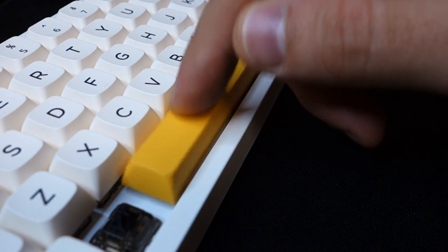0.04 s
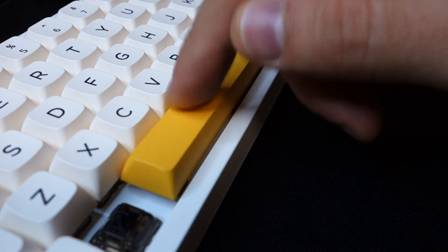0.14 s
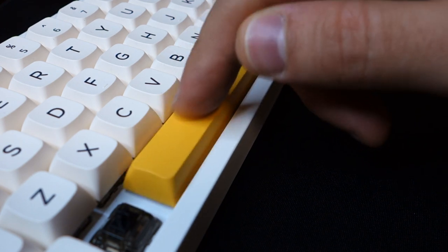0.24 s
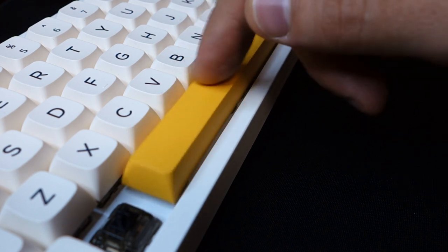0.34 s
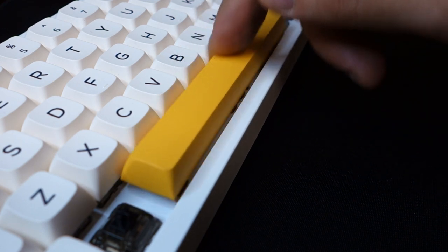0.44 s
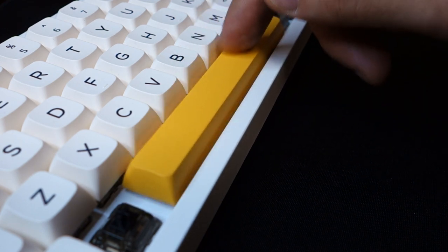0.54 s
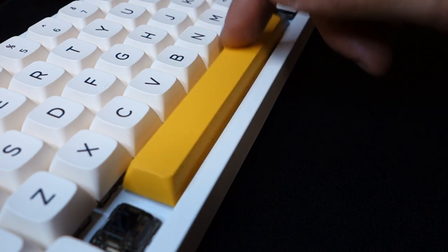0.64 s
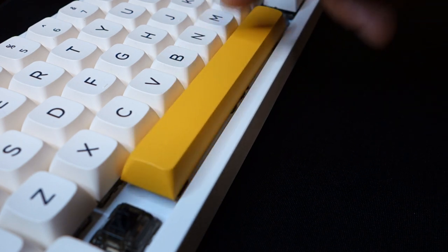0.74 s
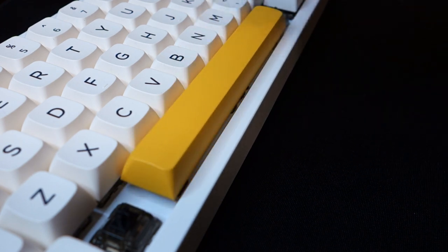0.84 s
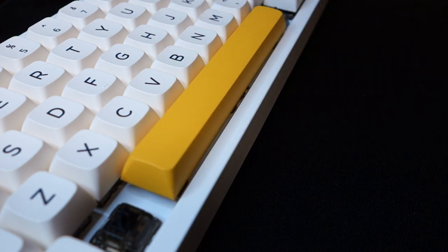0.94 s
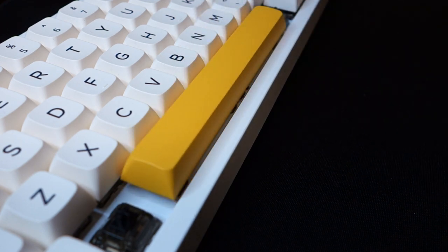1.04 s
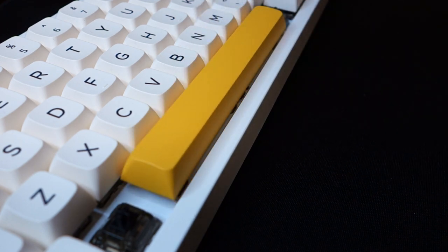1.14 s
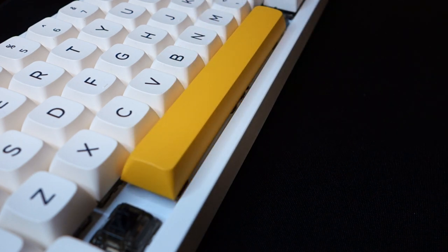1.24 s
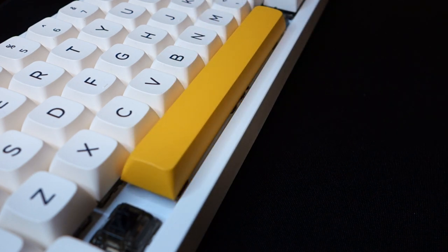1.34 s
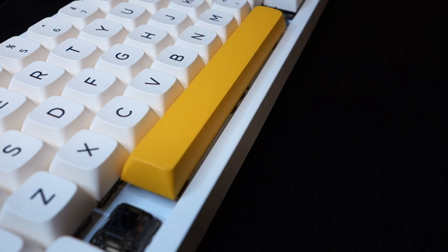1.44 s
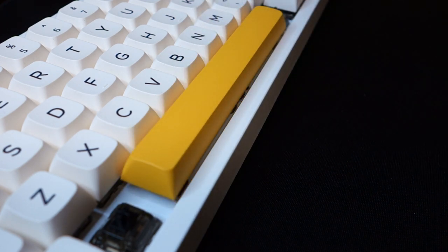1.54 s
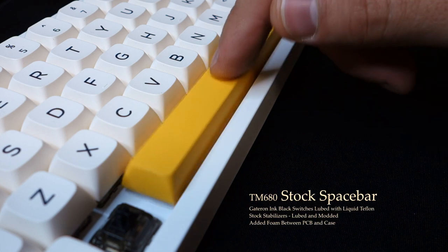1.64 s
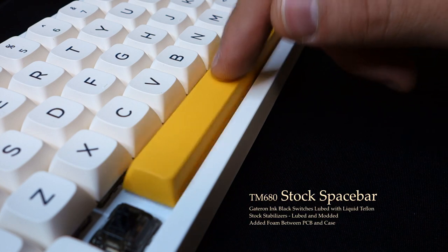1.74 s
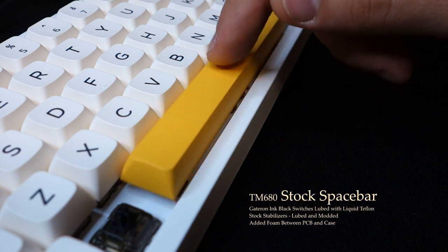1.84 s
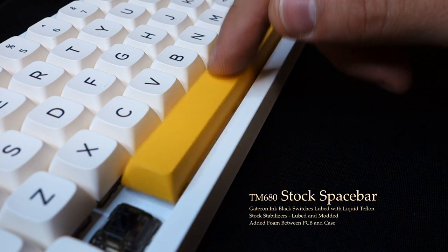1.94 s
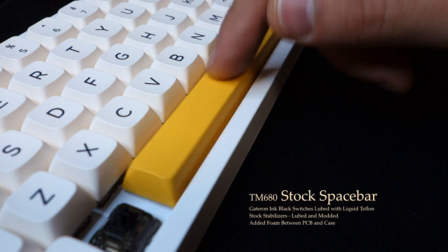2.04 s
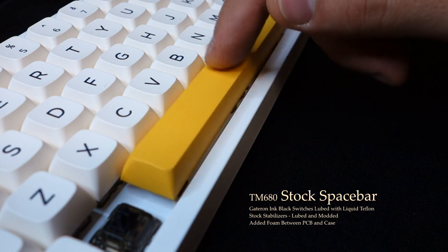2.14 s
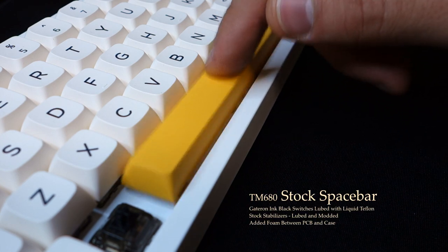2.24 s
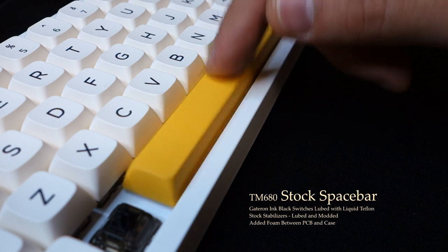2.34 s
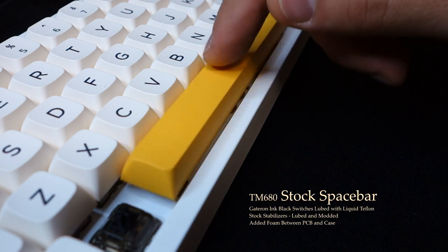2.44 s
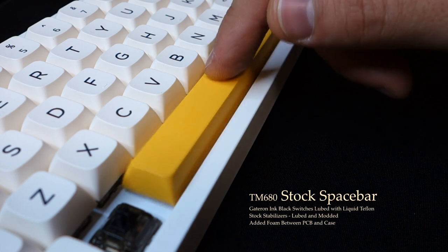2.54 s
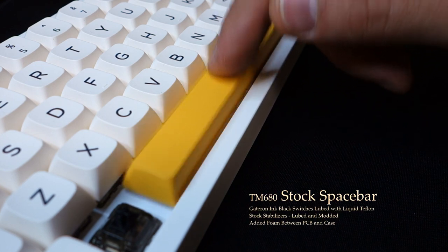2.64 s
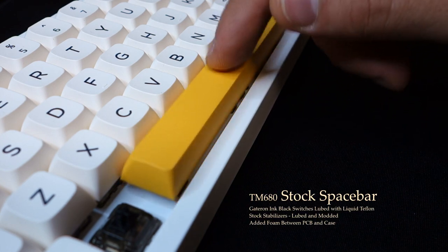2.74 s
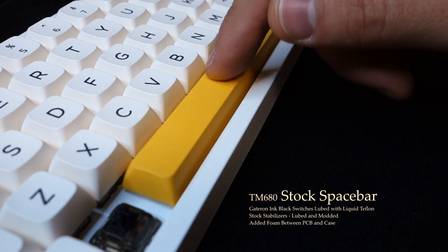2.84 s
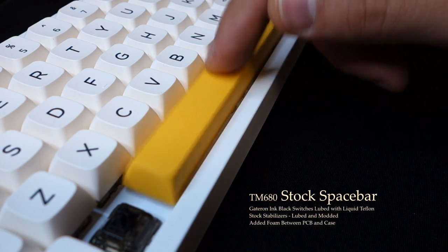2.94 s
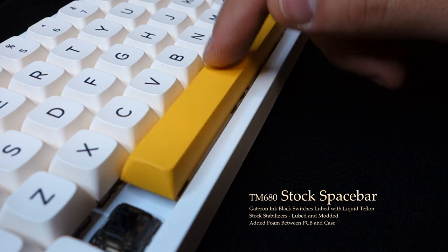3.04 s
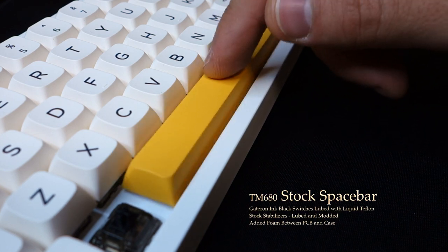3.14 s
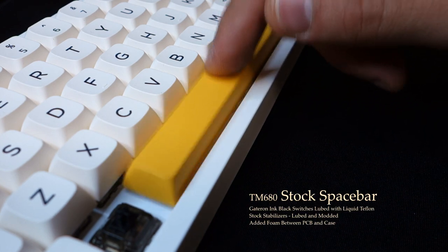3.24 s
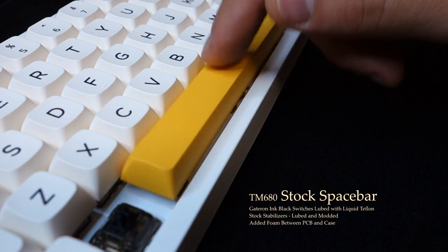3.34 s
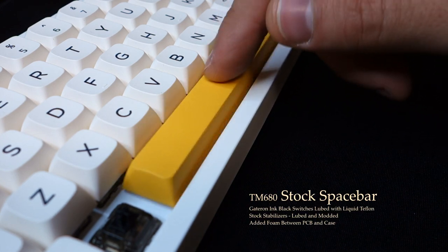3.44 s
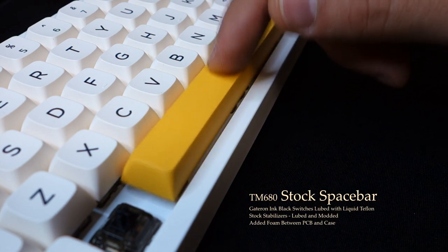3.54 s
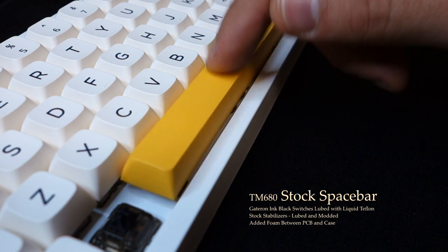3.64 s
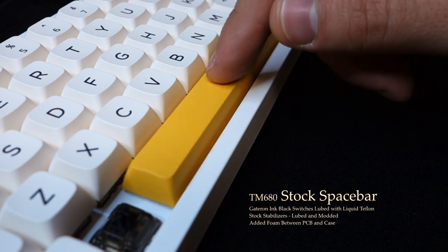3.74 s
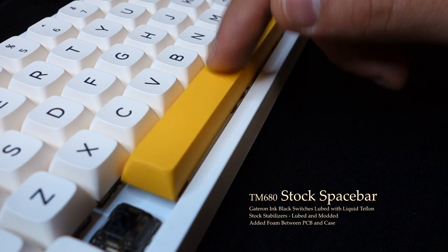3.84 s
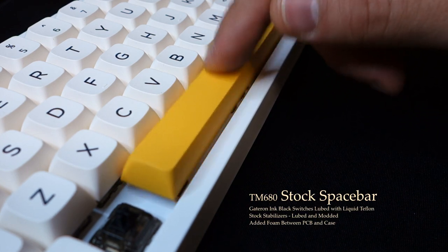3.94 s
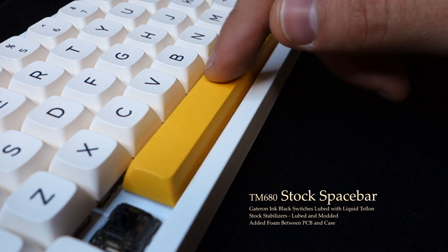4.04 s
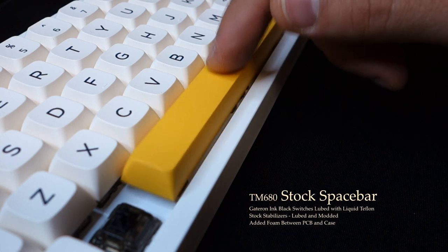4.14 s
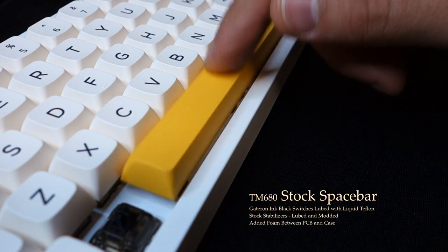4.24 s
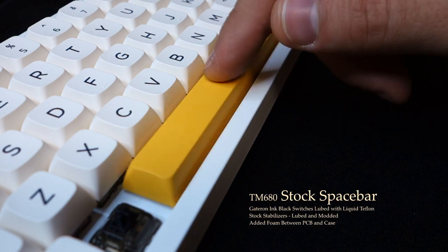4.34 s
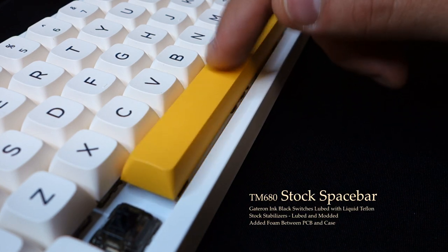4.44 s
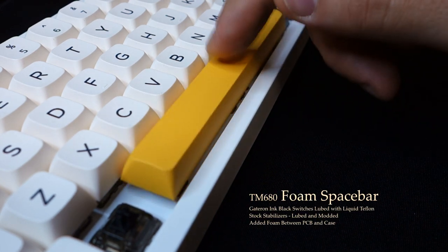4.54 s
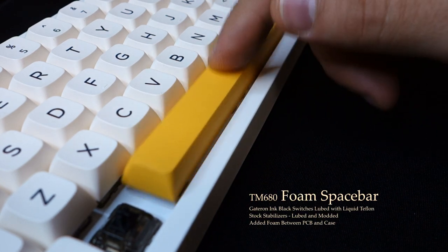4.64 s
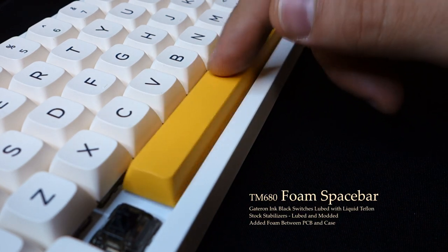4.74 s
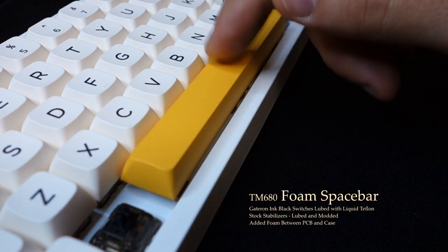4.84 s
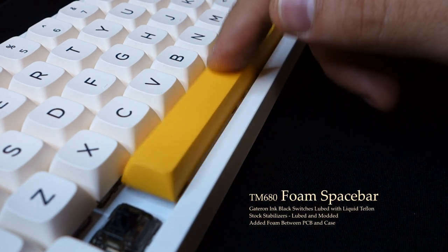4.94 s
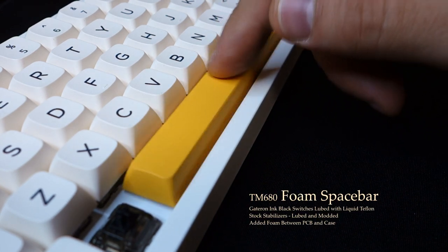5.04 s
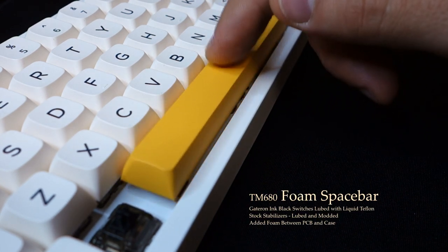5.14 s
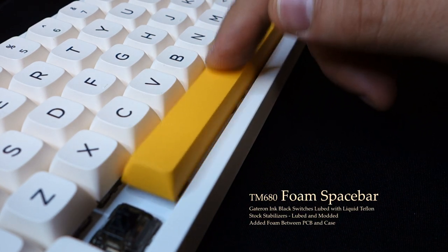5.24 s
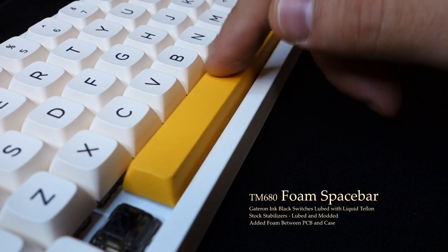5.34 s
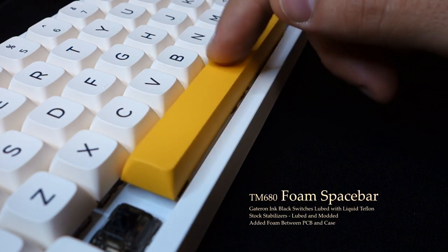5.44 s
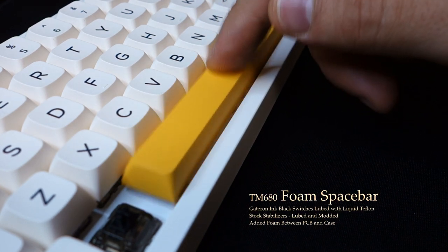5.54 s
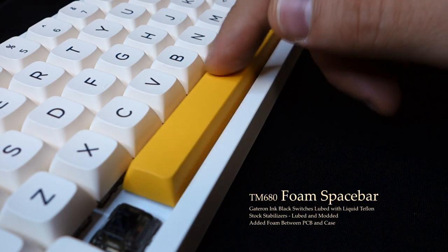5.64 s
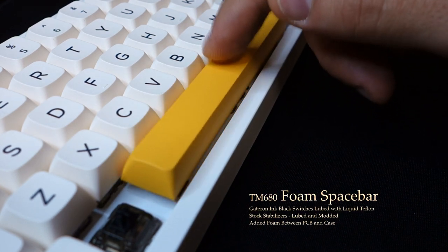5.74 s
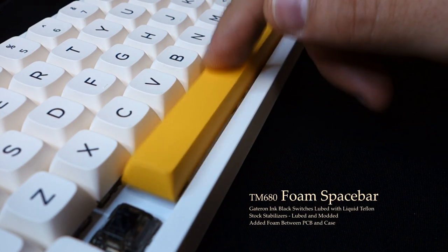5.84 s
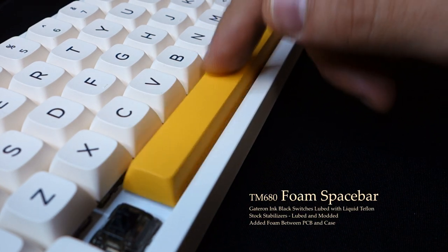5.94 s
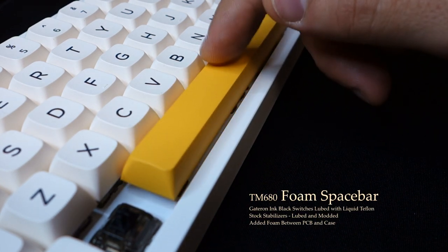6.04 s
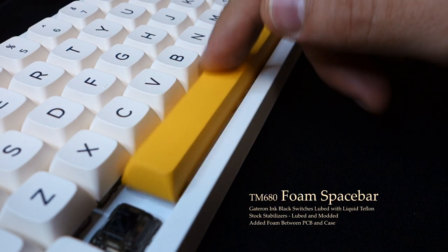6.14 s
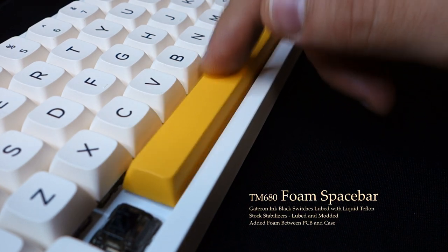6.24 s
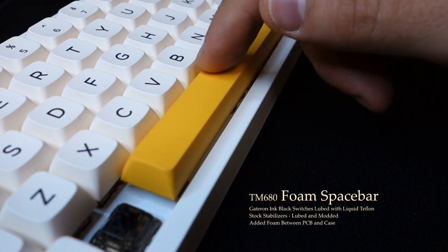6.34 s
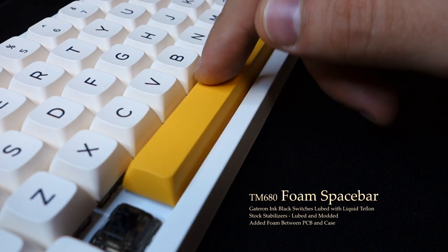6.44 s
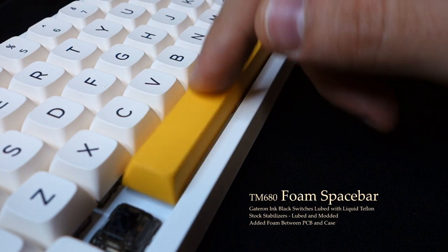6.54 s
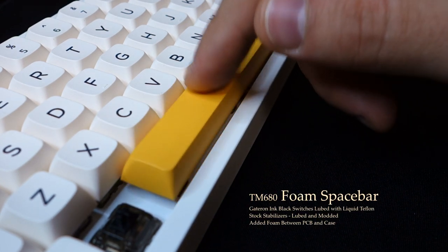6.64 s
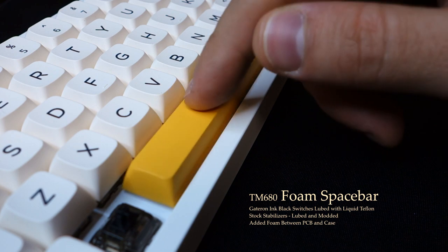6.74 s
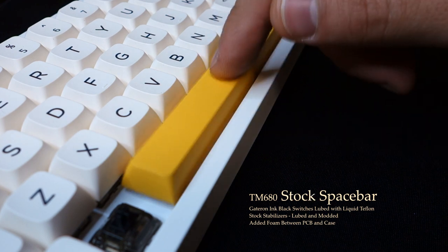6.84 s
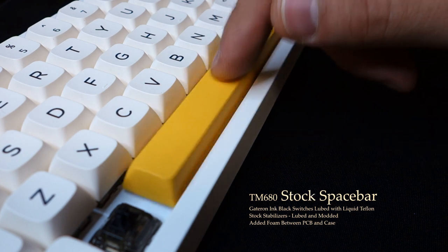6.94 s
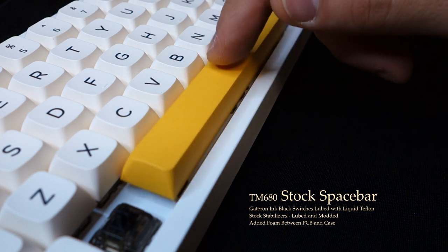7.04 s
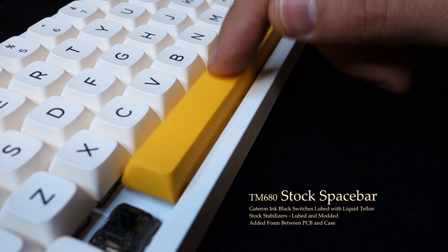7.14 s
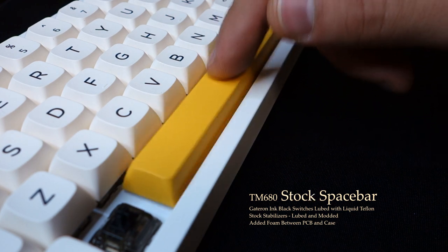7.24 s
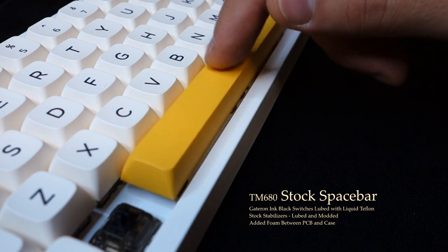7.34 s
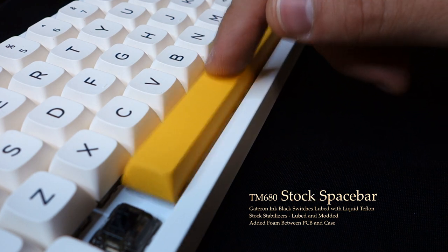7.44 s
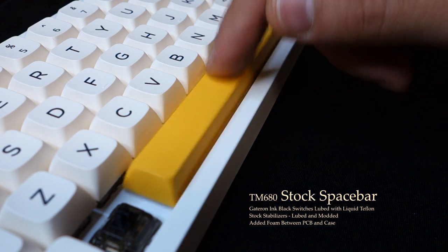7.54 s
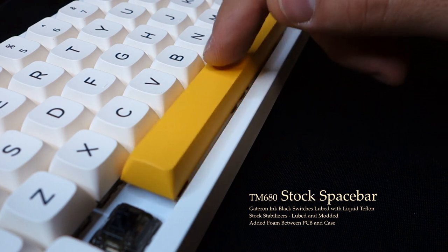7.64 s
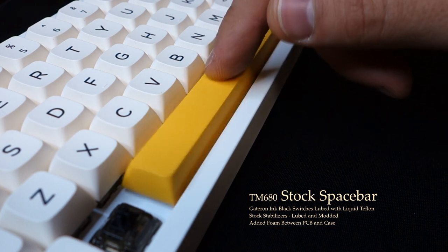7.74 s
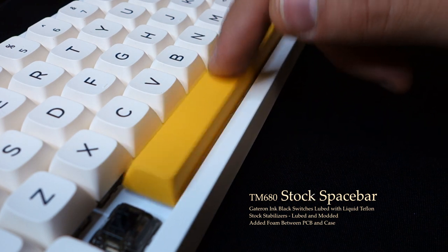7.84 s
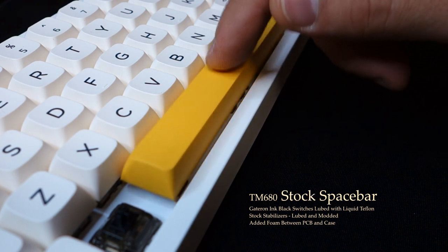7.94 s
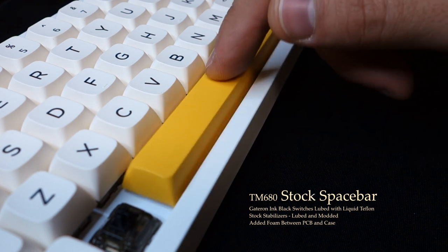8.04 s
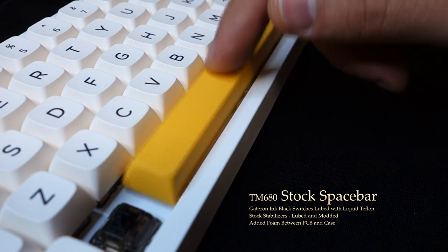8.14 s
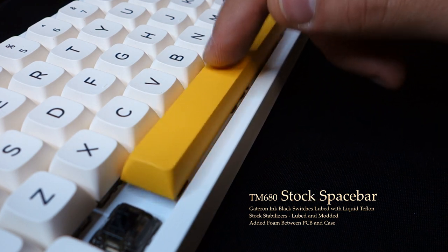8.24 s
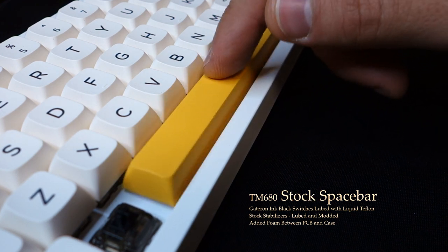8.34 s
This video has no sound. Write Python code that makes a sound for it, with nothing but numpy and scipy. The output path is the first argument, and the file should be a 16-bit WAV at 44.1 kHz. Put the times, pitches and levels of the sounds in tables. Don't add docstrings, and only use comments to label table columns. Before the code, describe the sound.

A finger taps the long bar of a mechanical keyboard on a desk, very close to the microphone. A few muted double knocks fade softer, with a little skin sliding, then a quiet pause. Quick regular pressing follows, loud and hollow at first, duller and tighter in the middle, hollow again at the end. Each press clacks down and clicks back up, over faint air hiss in a small furnished room.

```python
import sys
import numpy as np
from scipy import signal
from scipy.fft import rfft, irfft, next_fast_len
from scipy.io import wavfile
from scipy.ndimage import uniform_filter1d

SR = 44100
rng = np.random.default_rng(int(sys.argv[2]) if len(sys.argv) > 2 else 0)


def generate_wav(sig):
    pcm = np.round(np.clip(np.atleast_2d(sig).T, -1, 1) * 32767).astype(np.int16)
    wavfile.write(sys.argv[1], SR, pcm)


def gain_from_db(level_db):
    decades = np.asarray(level_db, float) / 20
    return 10 ** decades


N = 369999
TIME = np.arange(N) / SR


def decay(t, t60):
    return np.exp(-np.log(1000) * t / t60)


def colour(x, points):
    hz, db = np.transpose(points)
    samples = x.shape[-1]
    size = next_fast_len(samples)
    bins_hz = np.maximum(np.arange(size // 2 + 1) * SR / size, 1)
    gain = gain_from_db(np.interp(np.log(bins_hz), np.log(hz), db))
    return irfft(rfft(x, size) * gain, size)[..., :samples]


def unit(x):
    return x / np.sqrt(np.mean(x ** 2, axis=-1, keepdims=True))


def band(x, hz, width_hz):
    return signal.lfilter(*signal.iirpeak(hz, hz / width_hz, fs=SR), x)


def add(track, start_s, sounds):
    for start, sound in zip((np.asarray(start_s) * SR).astype(int), sounds):
        part = sound[max(-start, 0):N - start]
        start = max(start, 0)
        track[start:start + len(part)] += part


def rings(hz, t60, push_s, length_s):
    t = np.arange(int(length_s * SR)) / SR
    push = np.sin(np.pi * np.clip(t[:400] / push_s, 0, 1)) ** 2
    sines = np.sin(2 * np.pi * hz[:, None] * t) * decay(t, t60[:, None])
    return signal.lfilter(push / push.sum(), 1, sines)


# pitch_hz, density_db (per Hz)
AIR = [(10, -46), (22, -3), (50, 1), (115, -3), (170, -8.5), (350, -15), (700, -22), (1400, -25.5),
       (2800, -27.5), (5600, -31), (10000, -33.5), (15000, -33.5), (16200, -49)]


def still_air():
    return gain_from_db(-57.5) * unit(colour(rng.standard_normal(N), AIR))


# pitch_hz, t60_s, hollow_press_db, foam_press_db, release_db
ROOM = [(212.3, 0.13, -46.5, -42, -40), (297, 0.23, -50, -50, -48.5), (438, 0.093, -36, -44.5, -40.5),
        (680, 0.35, -49, -51, -53.5), (970, 0.056, -29.5, -37.5, -50.5), (1353, 0.11, -41.5, -41, -42.5),
        (1690, .19, -39.5, -44, -57.5), (2120, 0.19, -41.5, -53, -55.5), (2730, 0.21, -43.5, -51, -56.5),
        (3920, 0.036, -78.5, -71, -52.5), (5160, 0.27, -61, -61.5, -69), (7100, 0.11, -63, -66, -71),
        (10300, 0.05, -58, -84, -85)]


def room_bands():
    t = np.arange(int(.3 * SR)) / SR
    start_s, rise_s = 0.006, 0.00043
    edge = 1.17
    noise = []
    for hz, *_ in ROOM:
        sos = signal.butter(2, (hz / edge, hz * edge), "band", fs=SR, output="sos")
        noise.append(signal.sosfilt(sos, rng.standard_normal(len(t))))
    fall = decay(t, np.array(ROOM)[:, 1:2])
    return unit(np.array(noise)) * fall * np.clip((t - start_s) / rise_s, 0, 1)


# start_s, length_s, level_db, sag_db (over the length)
SLIDES = [
    (0.37, .032, -59, -9),
    (0.46, .1, -57.5, -2),
    (.65, .04, -62, -3),
]
# pitch_hz, width_hz, level_db
SLIDE_MODES = [(2800, 600, 6.5), (5070, 400, 4), (6760, 370, 3), (7900, 320, 2), (9050, 400, -5),
               (13500, 4700, -7)]


def slide():
    flicker = np.repeat(rng.standard_normal(N // 200 + 1), 200)[:N]
    noise = rng.standard_normal(N) * gain_from_db(3.2 * uniform_filter1d(flicker, size=200))
    hiss = unit(sum(gain_from_db(db) * band(noise, hz, width_hz) for hz, width_hz, db in SLIDE_MODES))
    start_s, length_s, level_db, sag_db = np.transpose(SLIDES)[:, :, None]
    outside_s = np.maximum(np.maximum(start_s - TIME, TIME - start_s - length_s), 0)
    held_db = level_db + sag_db * np.clip((TIME - start_s) / length_s, 0, 1)
    edge_db_per_s = 1400
    return hiss * gain_from_db(held_db - edge_db_per_s * outside_s).sum(axis=0)


LANDINGS_DB = [
    (-65, -65, -65, -48, -49, -65, -44),
    (-65, -65, -65, -49, -51, -65, -45, -65, -46, -59, -48, -51, -53, -43, -47, -49, -49, -49, -52, -53),
    (-65, -41, -50, -40, -53, -50, -65, -51, -56, -47, -43, -62, -54, -65, -65, -44),
]
# pitch_hz, level_db
TAP = [(500, -20), (1200, -4), (2200, 7), (3300, 1), (4200, -18), (8000, -15), (14000, -31)]


def fingertip(passage):
    down_s, _, up_s, _, _ = np.transpose(PASSAGES[passage])
    peak_db = np.array(LANDINGS_DB[passage])
    landing_s = down_s - .028 - .0007 * (-42 - peak_db)
    t = np.arange(1500) / SR
    shape = len(down_s), len(t)
    ticks = unit(colour(rng.standard_normal(shape), TAP)) * (decay(t, .012) + .2 * decay(t, .08))
    out = np.zeros(N)
    add(out, landing_s, gain_from_db(peak_db[:, None] - 6.5) * ticks)
    lift_ticks = unit(band(rng.standard_normal(shape), 2700, 350)) * decay(t, .025)
    lift_db = (-62 if passage == 1 else -54) + 3.3 * rng.standard_normal((len(up_s), 1))
    add(out, up_s - .016, gain_from_db(lift_db) * lift_ticks)
    return out


# pitch_hz, t60_s, press_swing, release_swing
DESK_MODES = [(28, 1, 0.0038, -0.0014), (64.2, 0.098, 0.034, -0.0033), (81.9, 0.26, -0.022, -0.011),
              (109, 0.12, -0.054, -0.039), (109.95, 0.65, 0.015, 0.012), (139.5, 0.46, 0.0033, 0.0085),
              (163, 0.41, -0.0035, -0.0011), (196, 0.13, -0.0063, 0.0102), (248.8, 0.17, 0.0018, -0.006),
              (290, 0.23, 0.0023, 0.00355)]
# pitch_hz, level_db
ROCKING = [(40, -7), (90, 3), (150, 14.5), (200, 1), (280, -20), (500, -46)]


def desk(swing, thump_db, push_s, rumble_db, scatter_db):
    hz, t60 = np.transpose(DESK_MODES)[:2]
    mode_db = thump_db + scatter_db * rng.standard_normal((len(thump_db), len(hz)))
    thump = swing * gain_from_db(mode_db) @ rings(hz, t60, push_s, .7)
    t = np.arange(thump.shape[1]) / SR
    rumble = unit(colour(rng.standard_normal(thump.shape), ROCKING))
    rocking = rumble * decay(t, 0.29) * (1 - decay(t, 0.035))
    return thump + gain_from_db(rumble_db + thump_db) * rocking


# pitch_hz, level_db
CRACK = [(2000, -26), (3500, 1.5), (5000, 6), (8000, -10.5), (11000, -7.5), (15000, -13), (17000, -25)]


def rattle(shape, t60):
    t = np.arange(shape[1]) / SR
    return unit(colour(rng.standard_normal(shape), CRACK)) * decay(t, t60)


# pitch_hz, t60_s, swing
WIRE_MODES = [(2160, .16, .0025), (2970, .14, .002), (3090, .12, -.0015), (3200, .16, .0035),
              (3290, .14, -.003), (5110, .11, .001), (5190, .14, -.0013), (5310, .1, .001),
              (7750, .07, .0013), (9350, .06, .0006)]


def wire(shaded):
    hz, t60, swing = np.transpose(WIRE_MODES)
    return swing * shaded(hz) @ rings(hz, t60, .0001, .2)


# delay_s, level_db
ECHOES = [(.0063, -30.5), (.02, -25.5), (.0302, -33.5)]


def strokes(rows, hz, t60, swing, desk_swing, room_db, room, push_s, desk_lag_s,
            crack_db, crack_t60, wire_db, rumble_db, scatter_db):
    start_s, harder_db, body_db, treble_db, thump_db = np.transpose(rows)[:, :, None]
    start_s = start_s[:, 0]

    def shaded(at_hz):
        db = harder_db + body_db * (at_hz < 1000) + treble_db * (at_hz > 4000)
        return gain_from_db(db + scatter_db * rng.standard_normal(db.shape))

    knock = swing * shaded(hz) @ rings(hz, t60, push_s, 0.14)
    knock = knock + gain_from_db(crack_db + harder_db + treble_db) * rattle(knock.shape, crack_t60)
    out = np.zeros(N)
    for lag_s, db in [(0.00052, 0.074)] + ECHOES:
        add(out, start_s + lag_s, gain_from_db(db) * knock)
    add(out, start_s, gain_from_db(wire_db) * wire(shaded))
    add(out, start_s, gain_from_db(room_db) * shaded(np.array(ROOM)[:, 0]) @ room)
    add(out, start_s + desk_lag_s, desk(desk_swing, thump_db, push_s, rumble_db, scatter_db))
    return out


# down_s, press_db, up_s, release_db, press_treble_db
FOAM_FIRST = [
    (-.1, -3, -.025, 0, 0),
    (.0473, .1, .1251, -5, 2.5),
    (.1899, 0, .261, 1, 1),
    (.3322, -2.1, .4043, -0.2, 2),
    (.4934, -5.5, .564, -10.5, 1),
    (.6284, 2, .6969, 3.5, 1),
    (.775, -11.5, .8158, 4.5, -1),
]
HOLLOW = [(1.575, -3, 1.645, -1.5, 0), (1.7258, 1, 1.802, -4.4, 0.5), (1.8678, -0.1, 1.9379, 0, 0.5),
          (2.0206, -0.3, 2.0924, -1.5, -2), (2.1668, -.4, 2.245, -3, -1), (2.3166, -1.5, 2.3885, .7, -1.5),
          (2.4741, 0.5, 2.5432, 0, 0), (2.6204, 1, 2.6973, 1.4, -2.5), (2.7779, 1.9, 2.8599, -3, -1),
          (2.9275, 1.5, 3.0025, 0.3, -1), (3.0828, -.3, 3.1564, -0.8, -3), (3.231, 0.8, 3.31, -2, 2),
          (3.379, -2, 3.4528, 2.2, -2), (3.54, 1, 3.6106, 1, -0.5), (3.6944, -.5, 3.7706, 1, -6.5),
          (3.848, -.5, 3.9173, 1.7, -1.5), (3.9972, 1, 4.0739, 2, -3.5), (4.152, -.9, 4.2262, -0.5, -.5),
          (4.2979, -0.8, 4.3761, .2, -2.5), (4.45, -.8, 4.5224, 1.5, -1)]
FOAM_LAST = [(4.5622, -1, 4.6235, 3.5, -8), (4.7112, 2.2, 4.784, 1.3, -3.5), (4.8592, .5, 4.9223, 3.5, 0),
             (5.014, 2, 5.0836, 1.5, -2), (5.159, 2.5, 5.234, -0.5, -1.5), (5.3144, -1.6, 5.3819, -1.3, 1),
             (5.458, 0.5, 5.5351, 1, -1), (5.6148, -2, 5.6871, 0, -3.5), (5.7593, 0, 5.8298, 3.5, 1),
             (5.9093, 1, 5.9806, 3.5, 0.5), (6.069, 1, 6.14, -0.5, 1), (6.2155, -3, 6.2847, 3.5, -1.5),
             (6.3712, 0.8, 6.4571, -4, -0.5), (6.5224, -0.6, 6.6027, -3.5, 1),
             (6.6874, 1.6, 6.7624, -1.8, -1.5), (6.857, -3, 6.93, 2, 0)]
PASSAGES = FOAM_FIRST, HOLLOW, FOAM_LAST
# pitch_hz, t60_s, hollow_swing, foam_swing (sign: the side that moves first)
PRESS_MODES = [(399, 0.12, -0.0106, -0.0083), (468, 0.081, 0.0334, 0.0278), (598, 0.024, -0.047, -0.0461),
               (734, 0.021, -0.0937, -0.0748), (857, 0.029, -0.0426, -0.0148), (925, 0.038, -0.022, -0.009),
               (1204, 0.033, -0.0212, -0.0285), (1378, 0.018, -0.0945, -0.0531),
               (1475, 0.038, -0.0697, -0.0274), (1717, 0.12, 0.0075, 0.0037), (1960, 0.015, 0.1763, 0.071),
               (2188, 0.015, 0.2099, 0.0789), (2308, 0.033, 0.0254, 0.0285), (2741, 0.01, 0.1006, 0.07),
               (3281, 0.021, -0.0628, -0.0102), (3502, 0.025, -0.0365, -0.0175),
               (4481, 0.008, 0.0347, 0.024), (4964, 0.02, -0.0273, -0.0044), (5705, 0.014, 0.0152, 0.0035),
               (5919, 0.015, 0.0131, 0.0152), (6840, 0.008, 0.0334, 0.0342), (7709, 0.01, -0.0263, -0.0054),
               (9248, 0.036, -0.0115, -0.0042)]
# pitch_hz, t60_s, swing
RELEASE_MODES = [(393, 0.114, 0.0082), (468, 0.067, -0.0162), (620, 0.032, 0.0227), (721, 0.029, 0.0485),
                 (915, 0.034, -0.018), (1208, 0.026, 0.0461), (1348, 0.11, 0.0022), (1466, 0.063, 0.0042),
                 (1606, 0.008, -0.0285), (1964, 0.018, -0.0156), (2210, 0.015, -0.0257),
                 (2313, 0.028, -0.0171), (2805, 0.014, -0.0505), (3212, 0.036, 0.0067),
                 (3457, 0.02, -0.0076), (4387, 0.008, -0.0094), (4936, 0.015, -0.0165),
                 (5608, 0.082, 0.0007), (5984, 0.033, -0.0026), (6776, 0.023, 0.0078),
                 (7620, 0.018, -0.0151), (9120, 0.035, -0.0251)]
PRESS_SLOPES = -0.43, 0.43
RELEASE_SLOPES = -.3, 0.67, 0.6
# body_db, thump_db
PRESS_SHADES = [
    (0.1, -1.2),
    (.6, 1),
    (.6, -0.2),
]
# body_db, treble_db, thump_db
RELEASE_SHADES = [
    (0.43, -4.5, 0.6),
    (-0.81, -3.5, -0.41),
    (0.27, -3, 0.66),
]


def spacebar(passage, room_down, room_up):
    down_s, down_db, up_s, up_db, treble_db = np.transpose(PASSAGES[passage])
    body_db, thump_db = np.transpose(np.outer(down_db, PRESS_SLOPES) + PRESS_SHADES[passage])
    down = np.column_stack([down_s, down_db, body_db, treble_db, thump_db])
    up_shade = np.outer(up_db, RELEASE_SLOPES) + RELEASE_SHADES[passage]
    up_shade[:, 1] += .8 * rng.standard_normal(len(up_s))
    up = np.column_stack([up_s, up_db, up_shade])

    hz, t60, hollow_swing, foam_swing = np.transpose(PRESS_MODES)
    desk_down, desk_up = np.transpose(DESK_MODES)[2:]
    hollow_room_db, foam_room_db, up_room_db = np.transpose(ROOM)[2:]
    if passage == 1:
        swing, room_db, crack_db, wire_db = hollow_swing, hollow_room_db, -37, 0
    else:
        swing, room_db, crack_db, wire_db = foam_swing, foam_room_db, -40, -4
    press = strokes(down, hz, t60, swing, desk_down, room_db, room_down, push_s=0.00016,
                    desk_lag_s=0.0016, crack_db=crack_db, crack_t60=0.018, wire_db=wire_db,
                    rumble_db=-43, scatter_db=0.9)
    release = strokes(up, *np.transpose(RELEASE_MODES), desk_up, up_room_db, room_up, push_s=0.0002,
                      desk_lag_s=.0047, crack_db=-46.0, crack_t60=0.029, wire_db=-4.9,
                      rumble_db=-48.5, scatter_db=1.74)
    return press + release


CUTS_S = (1.6607, 4.5607, 6.8607)


def scene():
    room_down, room_up = room_bands(), room_bands()
    edges_s = (-1, *CUTS_S)
    fade_in_s, fade_out_s = 0.0046, 0.0065
    out, hush = slide(), still_air()
    for passage, (start_s, end_s) in enumerate(zip(edges_s, edges_s[1:])):
        sound = spacebar(passage, room_down, room_up) + fingertip(passage) + hush
        fade = np.minimum((TIME - start_s) / fade_in_s, (end_s - TIME) / fade_out_s)
        out = out + sound * np.clip(fade, 0, 1)
    again, shift = round(CUTS_S[-1] * SR), round(5.2 * SR)
    return np.concatenate([out[:again], out[again - shift:N - shift]])[None]


def roll_off(x):
    return signal.sosfilt(signal.butter(12, 16580, fs=SR, output="sos"), x)


def record(dry):
    top = signal.ellip(8, .3, 60, 16200, fs=SR, output="sos")
    rounded = np.tanh(1.093 * dry) / 1.072
    return roll_off(signal.sosfilt(top, rounded))


dry = scene()
out = record(dry)
generate_wav(out)
```